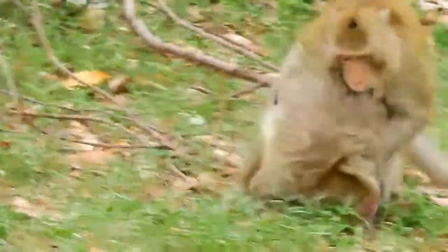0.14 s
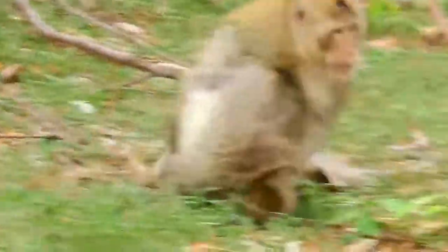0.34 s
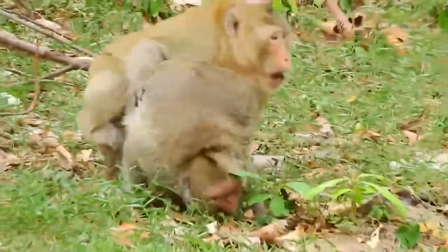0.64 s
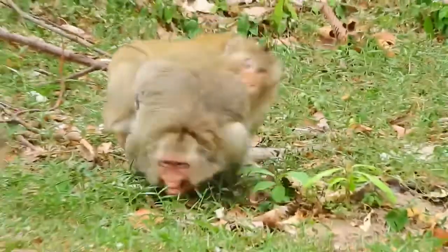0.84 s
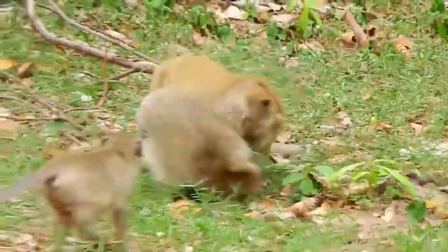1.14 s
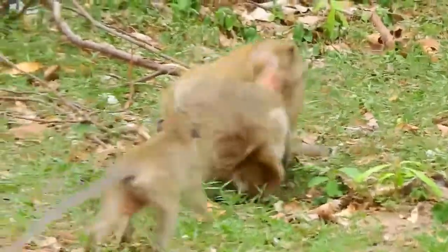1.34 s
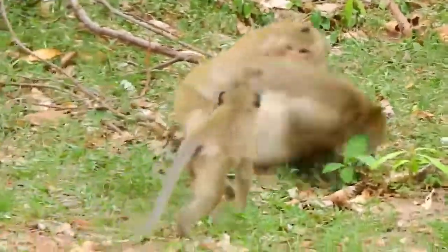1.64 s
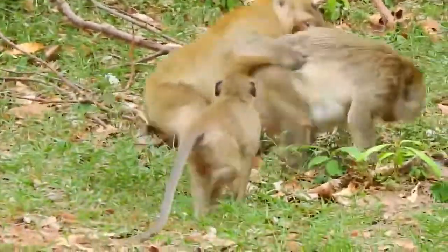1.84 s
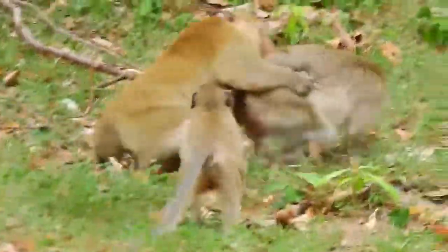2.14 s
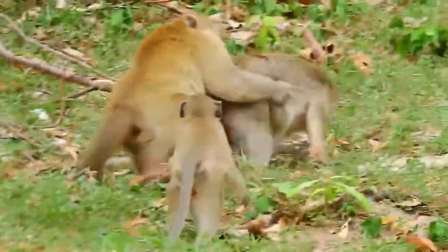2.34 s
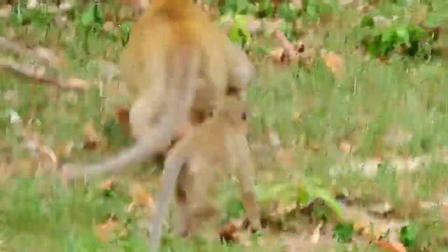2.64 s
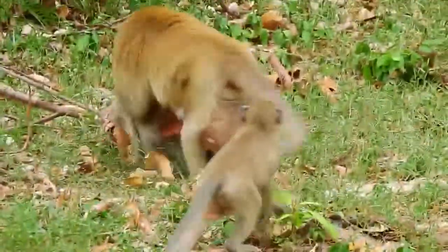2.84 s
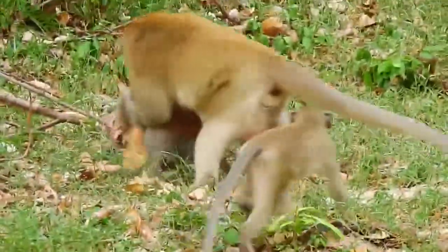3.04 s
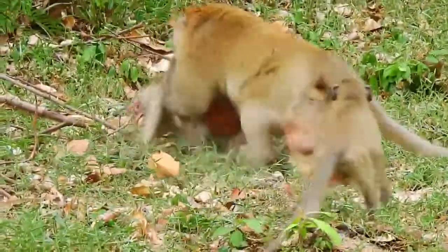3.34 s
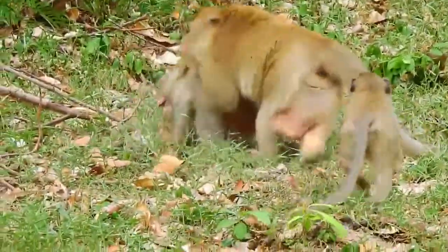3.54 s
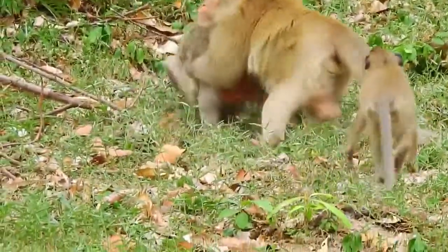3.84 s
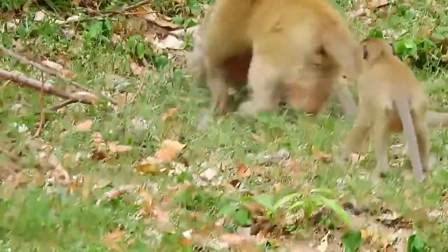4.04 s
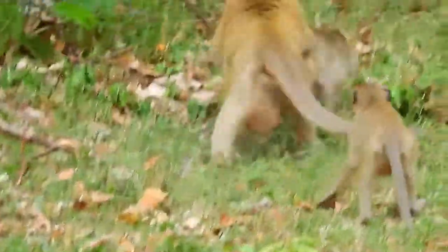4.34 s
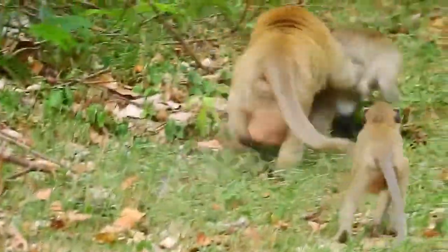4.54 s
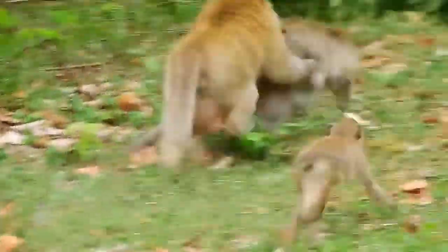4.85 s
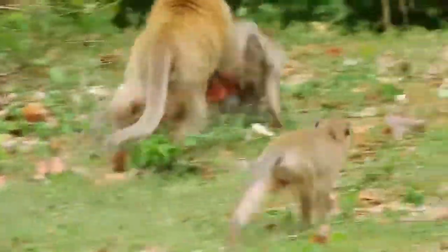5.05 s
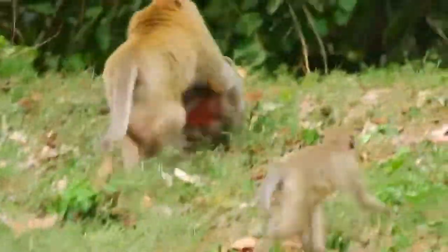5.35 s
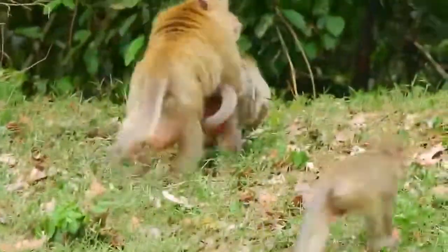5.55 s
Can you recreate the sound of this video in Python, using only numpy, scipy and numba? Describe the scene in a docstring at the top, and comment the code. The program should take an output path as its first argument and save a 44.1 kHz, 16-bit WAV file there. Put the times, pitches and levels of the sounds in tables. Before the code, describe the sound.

Shrill, torn macaque screeches come in rapid succession outdoors, with a few dull grass thuds, soft hiss and fading traffic rumble.

```python
"""Macaques tussle on a lawn at a forest edge, some metres from a camera.
Shaped noise gives a steady forest hiss; low noise and wavering harmonics give a fading roll and a far engine.
From the start one animal screams in bursts: chaotic fold pulses ring a small open mouth, and trunks echo them.
From 0.3 s the folds lock now and then into clean squeals, made of a gliding tone and two overtones.
At 1.2, 1.3 and 2.4 s bodies land on the grass as dull noise bursts; the screams end near 5.3 s."""
import sys
import numpy as np
from scipy import signal
from scipy.fft import rfft, irfft
from scipy.io import wavfile
from scipy.ndimage import uniform_filter1d
from numba import njit

SR = 44100
rng = np.random.default_rng(int(sys.argv[2]) if len(sys.argv) > 2 else 0)


def store_wav(level_fs):
    """Save 16-bit WAV to argv[1]."""
    pcm = np.round(np.clip(np.atleast_2d(level_fs), -1, 1) * 32767)
    wavfile.write(sys.argv[1], SR, pcm.T.astype(np.int16))


N = 251811  # length [samples]


def undb(db):
    """Level to amplitude: 20 dB is a factor of ten."""
    return 10 ** (np.asarray(db) / 20)


def unit(x):
    """Normalisation to a root mean square of one."""
    return x / np.sqrt(np.mean(x ** 2))


@njit
def svf(x, hz, width):
    """Second-order resonance: a state-variable band-pass with a moving centre and gain 1 there."""
    y, band_state, low_state = np.empty(len(x)), 0., 0.
    for i in range(len(x)):
        g = np.tan(np.pi * hz[i] / SR)
        damping = width / hz[i]
        v = (band_state + g * (x[i] - low_state)) / (1 + g * (g + damping))
        band_state = 2 * v - band_state
        low_state += 2 * g * v
        y[i] = damping * v
    return y


def band(x, hz, width):
    """Cascaded resonance: the band-pass twice over, for steep skirts."""
    hz = hz * np.ones(N)
    return svf(svf(x, hz, 1. * width), hz, 1. * width)


def walk(rate):
    """Slow random modulation: values held 1 / rate s, smoothed twice, with unit spread."""
    hold = int(SR / rate)
    steps = np.repeat(rng.standard_normal(N // hold + 1), hold)
    return unit(uniform_filter1d(uniform_filter1d(steps, hold), hold)[:N])


LOCK_EDGE_S = .006


def opened(spans):
    """Gating: open from each start to each end, with short linear edges just outside."""
    t = np.arange(N) / SR
    gates = (np.clip(np.minimum(t - a, b - t) / LOCK_EDGE_S + 1, 0, 1) for a, b in spans)
    return np.minimum(sum(gates), 1)


def shares(db):
    """Power-preserving balance: gains of two parts, db apart, whose powers add to one."""
    return 1 / np.sqrt(1 + undb(db) ** 2), 1 / np.sqrt(1 + undb(-db) ** 2)


AIR_DB = -28.5  # rms level of the mid signal
# Spectrum of the forest air: (frequency [Hz], relative density level [dB])
AIR_SPECTRUM = [(24, -70), (40, -19), (80, -9.5), (156, -5), (186, -2.5), (284, -6.5), (355, -12.5),
                (466, -17), (582, -17.5), (866, -18.5), (1030, -17.5), (1320, -20), (2640, -26.5),
                (6780, -21.5), (15000, -61)]
# Likeness of the two channels: (frequency [Hz], left-right correlation [1])
AIR_LIKENESS = [(60, 1), (640, 0.98), (1400, 0.97), (3100, 0.82), (6800, 0.026), (15000, 0.055)]


def air():
    """Diffuse-field coherence: hiss and rumble alike in the bass, nearly unrelated in the treble."""
    log_hz = np.log(np.maximum(np.fft.rfftfreq(N, 1 / SR), 1))
    colour_hz, colour_db = np.transpose(AIR_SPECTRUM)
    colour = undb(np.interp(log_hz, np.log(colour_hz), colour_db))
    alike_hz, correlation = np.transpose(AIR_LIKENESS)
    alike = np.clip(np.interp(log_hz, np.log(alike_hz), correlation), 0, 1)

    def part(sign):
        return irfft(rfft(rng.standard_normal(N)) * colour * np.sqrt(1 + sign * alike), N)

    mid, side = part(1), part(-1)
    return np.array([mid + side, mid - side]) * undb(AIR_DB) / np.sqrt(np.mean(mid ** 2))


ENGINE_HZ = 47.16  # mean fundamental
# Distant traffic rolling away: (time [s], level before a 1.5 dB cut [dB])
ROLL_LEVELS = [(0, -27), (1.5, -29), (4, -30.5), (5.71, -36.5)]
# Firing lines of the engine: (multiple of the fundamental [1], mean level [dB])
ENGINE_LINES = [(2, -50), (3, -43), (4, -36.5), (5, -40.5), (6, -53.5)]


def traffic():
    """Harmonic series over band noise: wavering firing lines of an idling engine and a fading roll."""
    s, db = np.transpose(ROLL_LEVELS)
    roll_db = np.interp(np.arange(N) / SR, s, db) - 1.5
    roll = undb(roll_db) * unit(band(rng.standard_normal(N), 94.0, 88.0))
    # a faint part of opposite sign left and right
    opposed = 0.055 * undb(-30.0) * unit(band(rng.standard_normal(N), 73.0, 90.))
    sound = roll * np.ones((2, 1)) + opposed * np.array([[1], [-1]])
    phase = 2 * np.pi * np.cumsum(ENGINE_HZ * (1 + 0.01029 * walk(2.5))) / SR
    for k, line_db in ENGINE_LINES:
        line_level = undb(line_db + 4.0 * walk(3.95)) * np.sqrt(2)
        sound = sound + line_level * np.sin(k * phase + 1.68 * walk(6))
    return sound


@njit
def beat(hz, stretch, size):
    """Relaxation oscillation: a pulse at each phase wrap, each cycle with its own length and size."""
    pulses, p, k = np.zeros(len(hz) + 1), 0., 0
    for i in range(len(hz)):
        step = hz[i] * stretch[k] / SR
        p += step
        if p >= 1:
            p, k = p - 1, k + 1
            # shared between two samples to place it between them
            pulses[i] += size[k] * p / step
            pulses[i + 1] += size[k] * (1 - p / step)
    return pulses[:-1]


# each ring flickers and drifts alone as jaw and tongue tremble
FLUTTER_DB, MOUTH_WANDER = 1.2, .03


def ring(source, hz, width):
    """Source-filter principle: one trembling resonance of the tract, at unit level."""
    trembling_hz = hz * np.exp(MOUTH_WANDER * walk(60))
    return unit(undb(FLUTTER_DB * walk(60)) * band(source, trembling_hz, width))


# chaos of the folds: period spread and rate drift [log ratio], size spread [dB]
JITTER, WANDER, SHIMMER_DB = .08, .05, 2.8
TURBULENCE_DB = -5  # rushing air that also rings the mouth, re the fold pulses
# the two mouth rings at a middle opening
MOUTH_MID_HZ, LOW_RING_HZ, HIGH_RING_HZ = 6033, 5486, 6297
RING_FOLLOW = .4  # the rings follow the mouth part of the way
HIGH_DB_PER_KHZ = 18  # the high ring takes over as the mouth rises
LOW_WIDTH_HZ, HIGH_WIDTH_HZ, FOLD_WIDTH_HZ, THROAT_WIDTH_HZ = 1600, 1500, 850, 700
RASP_DB = -9  # broad rasp under the mouth rings, re their level
# a short echo (delay [s], gain) leaves fixed ridges about 550 Hz apart in fold tone and throat
COMB_S, COMB = .0018, .3
# more breath with a high mouth, less with effort [dB per dB]
BREATH_DB_PER_KHZ, BREATH_EASE, EFFORT_MID_DB = 8.5, .72, -20
BREATH_FLICKER_DB = 1.5
LOCK_MOUTH_DB, LOCK_LOWER_DB = -3, -9  # the chaos sinks while the folds lock
# Level and colour of each scream over time; long screams run on through several tables:
# (time [s], level [dB], mouth ring [Hz], fold tone [dB re level], throat ring [dB re level])
SCREAM_TRACKS = [
    [(0.0, -16.5, 6260, -19, -13), (0.036, -12, 6300, -13, -15), (0.076, -20, 6400, -12, -11),
     (0.172, -19, 6560, -21, -20), (0.264, -19, 6300, -8.5, -18), (0.312, -12, 5950, -9, -4.5),
     (0.326, -11, 6000, -7, -14), (0.382, -41, 5470, 1, 13.5), (0.39, -34, 5360, -11, -4)],
    [(0.598, -21, 5920, -22, -20), (0.626, -20.5, 6300, -17, -5), (0.65, -17.5, 6300, -18, -12),
     (0.676, -15.5, 6200, -13, -17), (0.714, -10, 5700, -19, -17), (0.766, -26, 6000, -17, -3.5),
     (0.804, -14, 6650, -14.5, -18), (0.874, -16, 6000, -17, -23), (0.905, -19, 5600, -21, -26)],
    [(0.912, -13, 5950, -13, -22), (0.94, -12, 5820, -25, -44), (0.946, -11, 5940, -11, -32),
     (0.958, -8, 5900, -22, -44), (1.012, -14, 5830, -20, -42), (1.034, -14, 5870, -24, -16),
     (1.048, -14.5, 5600, -22, -17), (1.07, -18.5, 5400, -16, -13)],
    [(1.206, -16.5, 5700, -12, -16), (1.236, -8, 5630, -14, -18), (1.312, -25.5, 6740, -19, -20),
     (1.39, -28, 6000, -22, -28), (1.462, -22.5, 6540, -28, -24), (1.588, -27, 6950, -19, -33),
     (1.656, -18, 6070, -16, -24), (1.69, -15, 5830, -10, -10), (1.78, -38.5, 5640, -1, 0)],
    [(1.905, -32, 5200, -5, -7), (1.945, -19.5, 5130, -11, -14), (1.967, -20, 5100, -1.5, -11),
     (1.989, -17.5, 5600, -5, -9.5), (2.015, -17.5, 5900, -12, -14), (2.16, -32.5, 5950, -17, -4)],
    [(2.225, -22, 6170, -22, -14), (2.233, -31, 6120, -8, -9), (2.247, -19.5, 6000, -7, -20),
     (2.271, -10.5, 5900, -11, -22), (2.291, -14.5, 5910, -22, -0.5), (2.313, -17, 5270, -9, -12),
     (2.365, -32.5, 5700, -9, 8.5), (2.433, -36, 5350, -4, 2), (2.5, -41, 5640, -12, 9.5)],
    [(2.54, -29.5, 6100, -17, -5), (2.572, -22, 5770, -17, -17), (2.66, -14, 6100, -14, -8),
     (2.668, -14.5, 6150, -6.5, -12), (2.88, -19, 6000, -9, -12), (2.948, -19.5, 6300, -20, -15.5),
     (2.964, -15.5, 6500, -28, -25), (3.008, -24, 6400, -13, -21), (3.04, -24, 6240, -21, -17)],
    [(3.046, -24, 6240, -18, -18), (3.054, -23, 6220, -14, -19), (3.068, -13.5, 6250, -15, -22),
     (3.086, -9.5, 6130, -13, -14), (3.124, -18.5, 5900, -16, -4), (3.15, -40, 5640, 2, 12),
     (3.158, -33, 5650, -10, 5)],
    [(3.42, -28, 6070, -12, -20), (3.428, -27, 6100, -14, -30), (3.444, -20.5, 6300, -16, -23),
     (3.518, -14, 5850, -17, -18), (3.542, -6.5, 5700, -14, -8), (3.563, -13, 5260, -16, -9)],
    [(3.569, -13, 5460, -7.5, -19), (3.649, -13, 5160, -7.5, -24), (3.705, -12.5, 5170, -6, -17),
     (3.753, -14, 5150, -22, -24), (3.761, -24, 5100, -15, -16), (3.774, -13, 5070, -21, -18)],
    [(3.78, -14.5, 4700, -11, -17), (3.796, -19, 4600, -26, -15), (3.91, -30, 5050, -16, -6)],
    [(4.075, -30, 5370, -14, -15), (4.095, -25.5, 5780, -19, -17), (4.169, -21.5, 5900, -12, -8.5),
     (4.209, -20, 5250, -16, -11), (4.217, -17, 5480, -6, -8.5), (4.293, -30, 5400, -4, -11.5),
     (4.379, -25, 5130, -6, -1.5), (4.435, -36, 5450, 0, -24), (4.44, -27, 5320, -2, -15)],
    [(4.52, -33.5, 4900, 5, 0), (4.558, -19, 5170, -7, -4.5), (4.632, -15.5, 5500, -13, -2),
     (4.65, -13.5, 5500, -12, -15), (4.68, -17, 5750, -9, -3), (4.742, -20, 6240, -20, -13.5),
     (4.858, -27.5, 6400, -16, -7.5), (4.908, -31.5, 6150, -22, -12), (4.94, -33, 5800, -22, -19)],
    [(4.96, -27.5, 6430, -20, -15), (5.002, -29, 6100, -9, -3.5), (5.036, -20.5, 5800, -9, -5),
     (5.064, -21.5, 5900, 1, 2), (5.116, -25, 4850, -6, -7), (5.124, -23, 4900, -4, 3),
     (5.162, -31, 4980, -5, 1), (5.21, -39, 5860, -11, 0), (5.28, -53, 5450, -2, 8)],
]
# Voice of each of those tables: (first fold rate [Hz], last fold rate [Hz], first throat ring [Hz],
# last throat ring [Hz], breath before mouth and effort shifts [dB re level])
SCREAM_VOICES = [(3253, 2900, 2460, 2220, -15), (2940, 3150, 1710, 1980, -18),
                 (3338, 3400, 1400, 1580, -39), (3280, 2600, 1900, 2200, -17),
                 (3191, 3200, 2130, 2230, -16), (3203, 2800, 2260, 2100, -34),
                 (3133, 2600, 2320, 2260, -38), (3406, 3500, 2500, 1600, -19),
                 (3105, 3350, 2000, 2100, -12), (3347, 3050, 2400, 1900, -35),
                 (3354, 3200, 1900, 2000, -41), (3242, 3100, 1950, 2200, -34),
                 (3008, 2730, 2170, 2230, -13.5), (2846, 3800, 2400, 1800, -22)]


def screams(lock):
    """Source-filter principle: chaotic fold pulses and breath excite mouth and throat resonances."""
    t = np.arange(N) / SR
    s, *columns = np.transpose(np.vstack(SCREAM_TRACKS))
    db, mouth_hz, fold_db, throat_db = (np.interp(t, s, c) for c in columns)
    spans = np.array([(rows[0][0], rows[-1][0]) for rows in SCREAM_TRACKS])
    voices = np.array(SCREAM_VOICES)

    def glide(first, last):
        return np.interp(t, spans.ravel(), voices[:, [first, last]].ravel())

    fold_hz, throat_hz, breath_db = glide(0, 1), glide(2, 3), glide(4, 4)

    # the rate drifts over a few cycles, so the partials tear into streaks
    chance = np.clip(rng.standard_normal((N // 5, 2)).T, -2, 2)
    rate_hz = fold_hz * np.exp(WANDER * walk(250))
    pulses = beat(rate_hz, np.exp(JITTER * chance[0]), undb(SHIMMER_DB * chance[1]))
    rush = unit(pulses - np.mean(pulses)) + undb(TURBULENCE_DB) * rng.standard_normal(N)

    rise_hz = mouth_hz - MOUTH_MID_HZ
    low, high = shares(HIGH_DB_PER_KHZ * rise_hz / 1e3)
    mouth = low * ring(rush, LOW_RING_HZ + RING_FOLLOW * rise_hz, LOW_WIDTH_HZ)
    mouth = mouth + high * ring(rush, HIGH_RING_HZ + RING_FOLLOW * rise_hz, HIGH_WIDTH_HZ)
    mouth = mouth + undb(RASP_DB) * ring(rush, 4550., 1100.)

    fold_tone = undb(fold_db) * ring(pulses, fold_hz, FOLD_WIDTH_HZ)
    throat = undb(throat_db) * ring(rush, throat_hz, THROAT_WIDTH_HZ)
    lower = fold_tone + throat
    lower = lower + COMB * np.roll(lower, int(COMB_S * SR))

    breath_db = breath_db + BREATH_DB_PER_KHZ * rise_hz / 1e3 - BREATH_EASE * (db - EFFORT_MID_DB)
    breath_level = undb(breath_db + BREATH_FLICKER_DB * walk(10))
    breath = breath_level * ring(rng.standard_normal(N), 7100.0, 6800.0)

    voice = undb(LOCK_MOUTH_DB * lock) * mouth + undb(LOCK_LOWER_DB * lock) * lower + breath
    return opened(spans) * undb(db) * voice


EARLY_ECHO_S, EARLY_ECHO_DB = .07, -31.5  # one very faint early echo, re direct
WOOD_T60_S, WOOD_DB, WOOD_SIDE = .75, -7, .38  # decay time, mid tail re direct, side gain
DIRECT_SIDE_DB = -17


def wood(x):
    """Reverberation by convolution: a very faint early echo and a tail that differs left and right."""
    t = np.arange(int(1.2 * SR)) / SR
    decay = np.exp(-np.log(1000) * t / WOOD_T60_S) * np.clip(t / 0.0033, 0, 1)
    response = rng.standard_normal((2, len(t))) * decay  # rows: mid, side
    response *= undb(WOOD_DB) / np.sqrt(np.sum(response[0] ** 2))
    response[1] *= WOOD_SIDE
    response[0, 1] += 1  # direct sound
    response[0, int(EARLY_ECHO_S * SR)] += undb(EARLY_ECHO_DB)
    # the two ports hear the direct sound a little apart
    response[1, :3] += undb(DIRECT_SIDE_DB) * np.array([1, 0, -1])
    mid, side = signal.fftconvolve(x[None], response, axes=1)[:, :N]
    return np.array([mid + side, mid - side])


SQUEAL_EDGE_DB = -5.5  # a squeal swells and fades this far at its ends
THIRD_DB = -2  # the third partial starts weaker
# the mouth favours overtones here; level per octave squared below and above
OVERTONE_HZ, UNDER_DB, OVER_DB = 5200, -8, -60
# Locked squeals: (start [s], length [s], first pitch [Hz], last pitch [Hz],
# tone [dB], overtones [dB]), both levels before the lift in scene()
SQUEAL_EVENTS = [ (0.305, .025, 2720, 2830, -24, -25), (0.37, .018, 1770, 1530, -28, -36),
                 (0.705, .04, 2650, 2740, -29, -21), (0.875, .04, 2330, 2800, -42, -18),
                 (0.92, .11, 3240, 3330, -29, -20), (1.225, .07, 3330, 3220, -30, -22),
                 (1.68, .032, 2550, 2950, -36, -18), (1.75, .022, 1780, 1510, -31, -38),
                 (2.278, .024, 2370, 2400, -18, -23), (2.31, .026, 2360, 2000, -30, -22),
                 (2.336, .03, 2000, 2010, -23, -36), (3.095, .058, 2130, 1670, -24, -20),
                 (3.525, .042, 1850, 2250, -35, -23), (3.7, .072, 2980, 2540, -25, -20),
                 (4.36, .025, 1620, 1610, -34, -40), (4.605, .025, 2610, 2680, -28, -20),
                 (4.642, .028, 2700, 2670, -22, -15), (5.053, .05, 2810, 2790, -25, -35),
                 (5.125, .045, 1800, 1440, -33, -36), (5.245, .03, 1620, 1610, -40, -45), ]


def squeals():
    """Phase locking: a wavering tone with two overtones; rises come early, falls late."""
    out, drift, waver = np.zeros(N), .012 * walk(300), undb(2.8 * walk(150))
    for s, length, first_hz, last_hz, tone_db, overtone_db in SQUEAL_EVENTS:
        i = np.arange(int((s - LOCK_EDGE_S) * SR), int((s + length + LOCK_EDGE_S) * SR))
        u = np.clip((i / SR - s) / length, 0, 1)
        bend = u ** 2 if last_hz < first_hz else 1 - (1 - u) ** 2
        hz = first_hz + (last_hz - first_hz) * bend
        phase = 2 * np.pi * np.cumsum(hz * (1 + drift[i])) / SR
        voice = undb(tone_db) * np.sin(phase)
        for k, start_db in ((2, 0), (3, THIRD_DB)):
            octaves = np.log2(k * hz / OVERTONE_HZ)
            mouth_db = np.where(octaves < 0, UNDER_DB, OVER_DB) * octaves ** 2
            voice = voice + undb(overtone_db + start_db + mouth_db) * np.sin(k * phase)
        out[i] += undb(SQUEAL_EDGE_DB * (2 * u - 1) ** 2) * voice
    return np.sqrt(2) * waver * out


# Bodies landing on the grass: (time [s], peak of the envelope before a gain of 0.69 [dB])
THUD_EVENTS = [(1.213, -21), (1.301, -30), (2.389, -34)]


def thuds():
    """Damped impact: dull band noise that starts at once and decays exponentially."""
    t, shape = np.arange(N) / SR, 0
    for s, db in THUD_EVENTS:
        shape = shape + undb(db) * (t > s) * np.exp(-np.maximum(t - s, 0) / 0.051)
    return 0.69 * shape * unit(svf(rng.standard_normal(N), np.full(N, 450.), 702.0))


def scene():
    """Superposition: the echoed voice, the thuds, the air and the traffic add up."""
    lock = opened([(s, s + length) for s, length, *_ in SQUEAL_EVENTS])
    locked = undb(2.2) * lock * squeals()
    return wood(screams(lock) + locked) + thuds() + air() + traffic()


DIP_HZ, DIP_WIDTH_HZ, DIP = 3970., 300., .62  # the camera body cancels part of a narrow band
TREBLE_HZ, BASS_HZ, TOP_HZ = 8470, 45.6, 15650  # the microphone falls away above the first


def record(dry):
    """Transducer response: a narrow dip, rounded peaks, soft treble and bass and a cut top."""
    cancelled = np.array([svf(c, np.full(N, DIP_HZ), DIP_WIDTH_HZ) for c in dry])
    rounded = np.tanh(.9 * (dry - DIP * cancelled)) / .9
    soft = signal.sosfilt(signal.butter(2, TREBLE_HZ, fs=SR, output="sos"), rounded)
    soft = signal.sosfilt(signal.butter(2, BASS_HZ, "high", fs=SR, output="sos"), soft)
    return signal.sosfilt(signal.ellip(8, .2, 70, TOP_HZ, fs=SR, output="sos"), soft)


dry = scene()
out = record(dry)
store_wav(out)
```